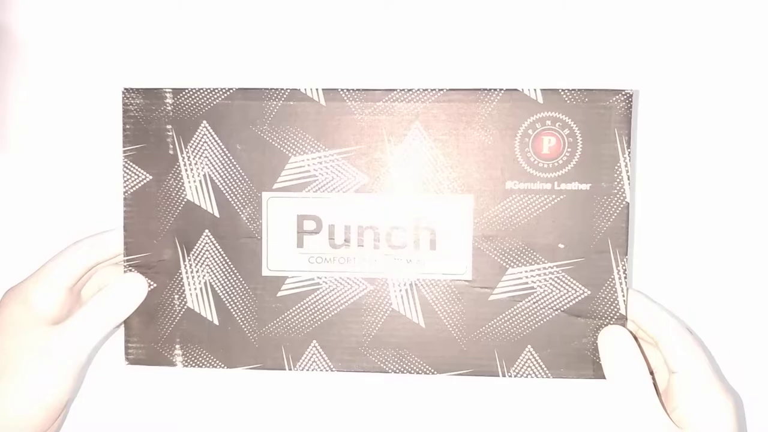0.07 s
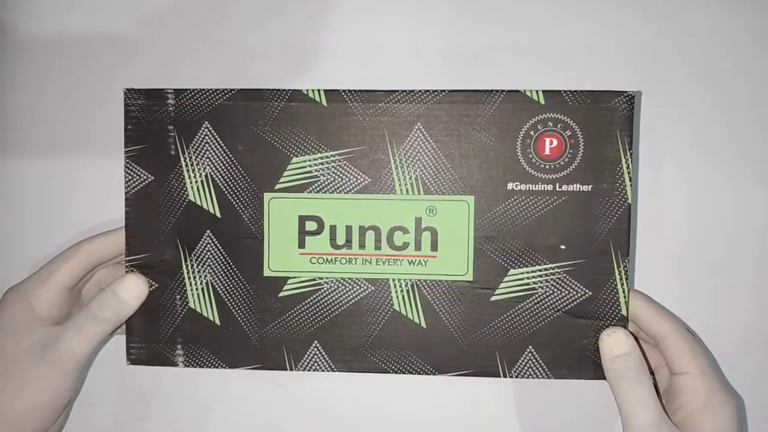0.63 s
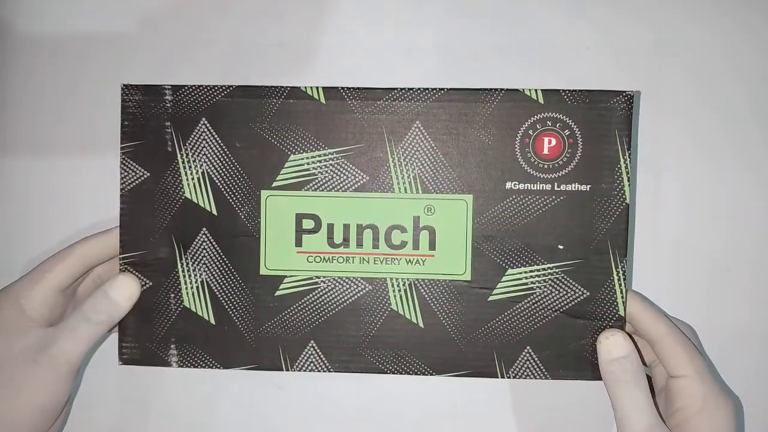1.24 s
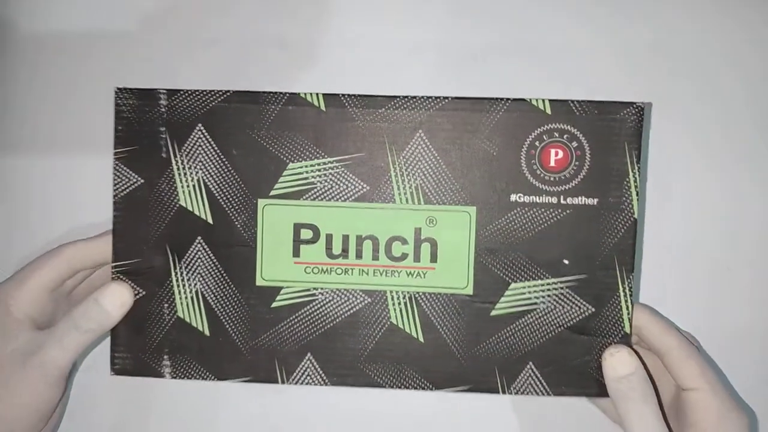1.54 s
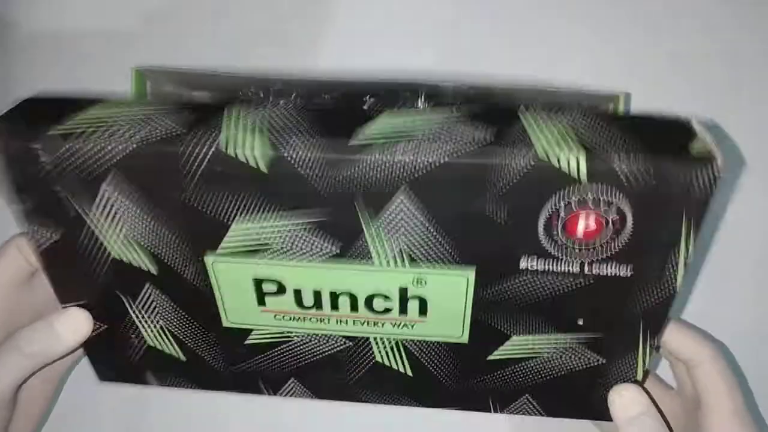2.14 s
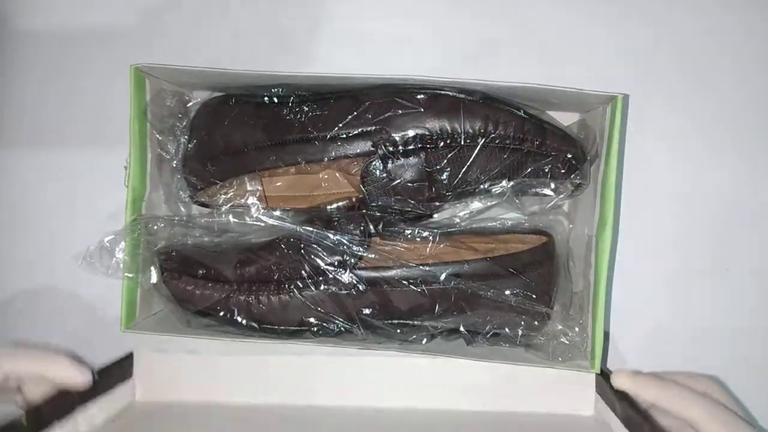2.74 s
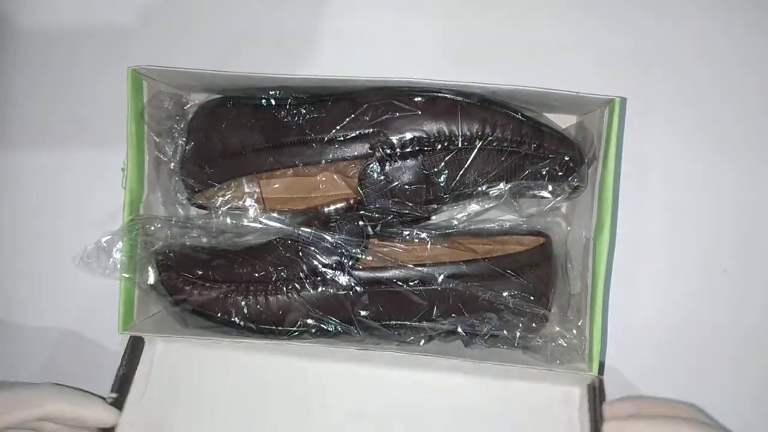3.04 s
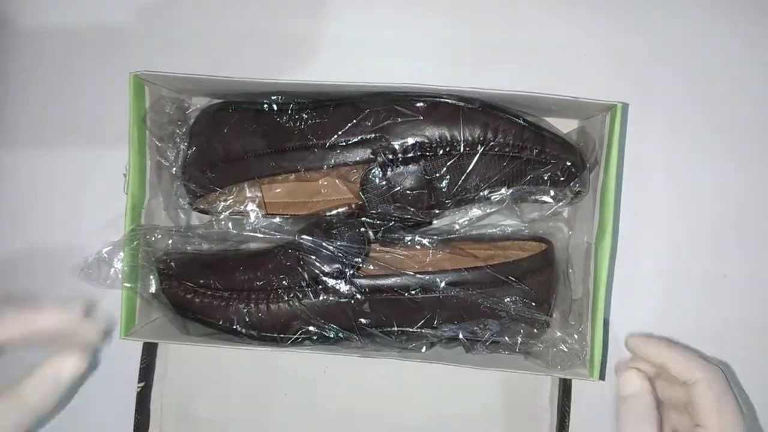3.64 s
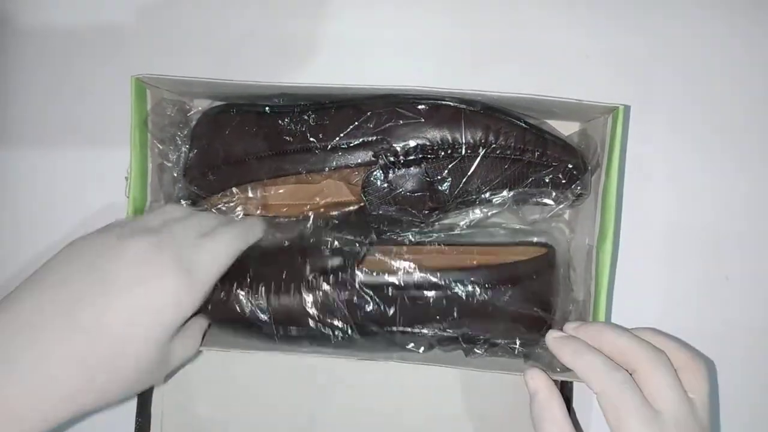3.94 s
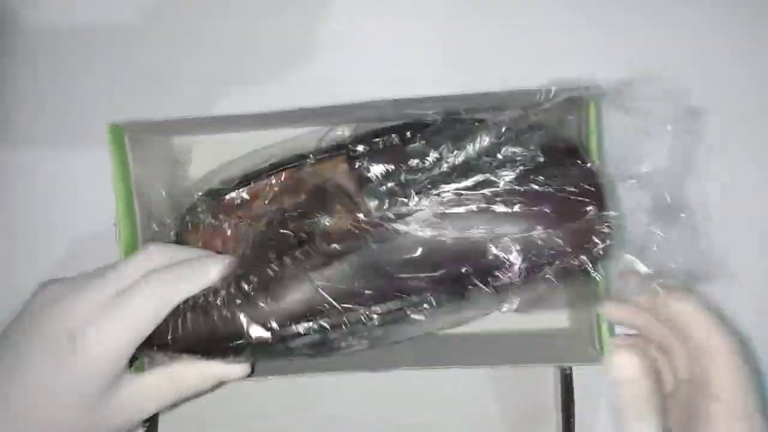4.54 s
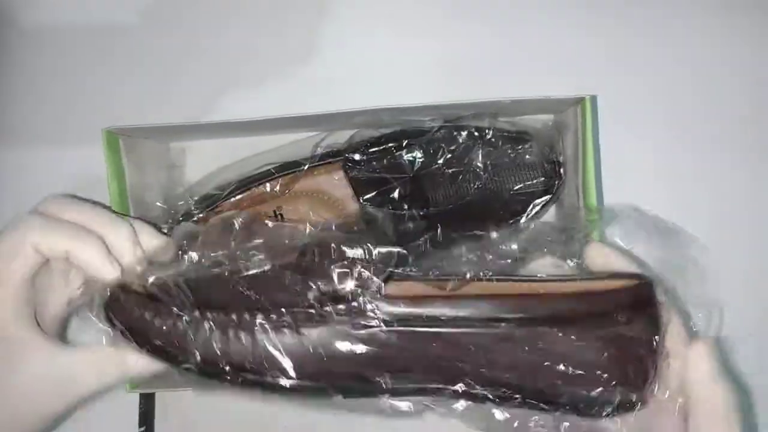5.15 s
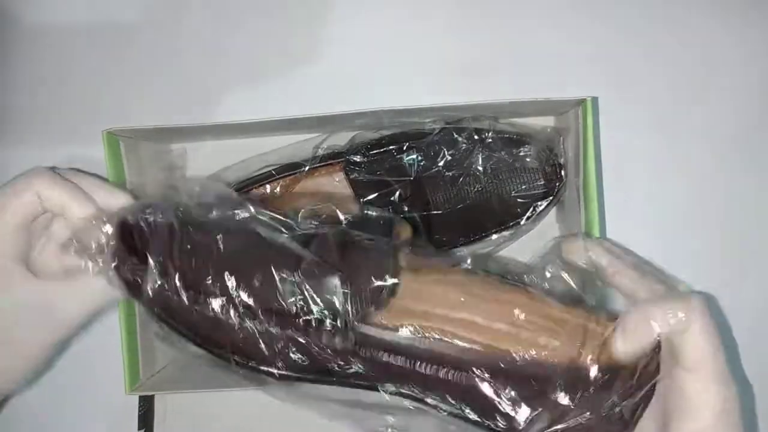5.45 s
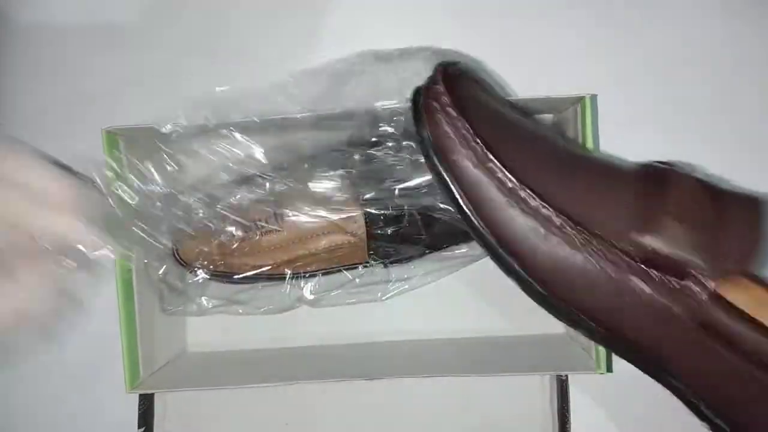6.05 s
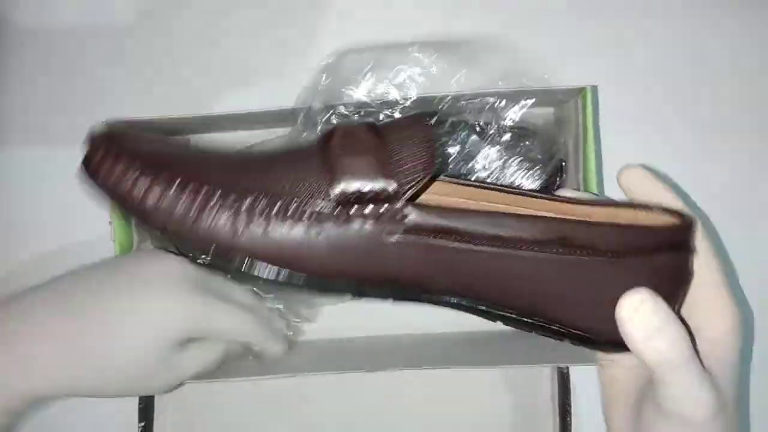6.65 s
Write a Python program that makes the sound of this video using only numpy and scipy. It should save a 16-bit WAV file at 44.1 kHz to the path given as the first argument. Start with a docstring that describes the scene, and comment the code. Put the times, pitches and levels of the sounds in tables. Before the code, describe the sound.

A steady rush of air, like a fan, fades in within a small room. The lid of a cardboard shoe box scrapes, knocks loose and flops down with hollow thumps. Then a thin plastic bag is pulled off a shoe in repeated tugs, fizzing, crackling and snapping, while the shoe bumps the box a few times. Everything is heard from close by, in stereo.

```python
"""In a small room with a steady rush of air, as from a fan, a cardboard shoe box is opened on a table.
The lid scrapes, knocks loose and flops down, and a shoe bumps the box: each blow puffs out air, rings
the panels and slaps card on card. The shoe's thin plastic bag is pulled off tug by tug, fizzing as it
slides, crackling as it creases and snapping as folds flip over. Two unlike microphones, a hand apart,
hear it all from close by, and the sound fades in at the start."""
import sys
import numpy as np
from scipy import signal
from scipy.fft import rfft, irfft
from scipy.io import wavfile

SR = 44100
rng = np.random.default_rng(int(sys.argv[2]) if len(sys.argv) > 2 else 0)


def digitize_waveform(pressure):
    """Quantize a signal to 16-bit integers and store it at the path in sys.argv[1].

    Rows of a 2-D input are taken as channels; values are limited to [-1, 1].
    """
    field = np.atleast_2d(pressure).T
    bounded = np.clip(field, -1, 1)
    quanta = np.round(bounded * 32767).astype(np.int16)
    wavfile.write(sys.argv[1], SR, quanta)


N = 300497

# tone of the rushing air: (frequency [Hz], level [dB])
AIR_TONE = [(20, -4.5), (65, -6), (115, -11), (175, -2.5), (220, -1), (260, -8.5), (360, -0.5),
            (600, -11.5), (800, -9), (1300, -13.5), (1950, -14.5), (2450, -20), (3100, -34), (6000, -54.5)]
# tone of the faint background hiss: (frequency [Hz], level [dB])
HISS_TONE = [(1500, -75), (3000, 4), (4200, 4.5), (6000, 0.5), (7500, 0.5), (9000, -10), (11000, -15),
             (16000, -46)]
# moments when the background hiss drops out: (time [s], depth [dB], half width [s])
HISS_DROPOUTS = [(.66, 26, 0.013), (.99, 7.5, 0.091), (1.25, 9, 0.03), (3.55, 16, 0.015), (3.67, 22, 0.039)]
# the lid comes off, is laid back and drops: (peak time [s], length [s], level [dB])
LID_SCRAPES = [(2.105, .035, -70), (2.188, 0.08, -51), (2.828, .02, -57), (2.94, 0.068, -62),
               (3.24, 0.059, -53.5)]
# tone of sliding card or plastic: (frequency [Hz], level [dB])
SLIDE_TONE = [(300, -11), (1000, 4.5), (2200, 3), (3100, -4.5), (4200, -1.5), (5800, -3.5), (7500, -6),
              (9000, -11), (11000, -19), (13000, -32), (16000, -26)]
# blows on the box; the last two columns are compared with the first strike: (time [s], puff [dB],
# puff pitch [Hz], ring [dB], slap before its gain [dB], brightness [Hz], flat landing [dB], rebound [dB])
BOX_KNOCKS = [(2.165, -10.5, 230, -27, -16.5, 1070, 5.5, -2.5), (2.197, -16, 200, -43, -20, 1640, -22, -26),
              (2.231, -22, 90, -31.5, -24, 1450, -3, -18), (2.278, -17, 150, -36, -34, 606, -12, -17),
              (2.835, -35.5, 110, -38.5, -27, 1700, -3.5, -30),
              (2.946, -31, 120, -42, -29.5, 1740, -1.5, -20), (3.059, -55, 120, -52, -28.5, 1150, -19, -24),
              (3.2036, -43, 330, -62, -30, 7000, -16, -32),
              (3.2049, -11.5, 298, -34.5, -11.5, 1240, -0.5, -14),
              (3.433, -20.5, 170, -54, -51, 385, -3.5, -22), (3.914, -49, 130, -39.5, -34, 700, 0, -18),
              (4.027, -33, 94, -37, -35, 900, -7, -26), (4.092, -37, 130, -33, -43, 1000, -9, -23),
              (4.592, -10, 124, -27.5, -14.5, 1840, -2.5, -9.5),
              (5.815, -24.5, 130, -42, -25, 690, 3.5, -6.5), (6.204, -31, 79, -38, -39, 930, -0.5, -22)]
# notes at which the box's panels ring: (frequency [Hz], level [dB])
PANEL_NOTES = [(80, -19.5), (95, 0.5), (150, -38.5), (236, -0.5), (275, 1.5), (325, -27.5), (452, 4.5),
               (560, -16), (655, -41), (790, -56), (940, -2), (1320, -24), (1980, -1)]
# tone of card slapping on card: (frequency [Hz], level [dB])
SLAP_TONE = [(30, -22), (100, -8), (400, 0), (900, 1), (1500, 0), (2100, 0), (3000, -4), (5000, -4),
             (7500, -1), (10000, -10), (16000, -22)]
# how fast a slap dies: (frequency [Hz], time to fall 60 dB [s])
SLAP_DECAY = [(200, .07), (1000, .06), (3000, .05), (12000, .05)]
# sharp snaps of the plastic: (time [s], tick [dB], pop [dB])
BAG_SNAPS = [(2.8867, -39, -56), (2.9345, -40.5, -52), (3.201, -30, -25), (3.7475, -39.5, -63),
             (3.8416, -43, -58), (4.3403, -28.5, -26), (4.642, -25, -26), (4.9113, -20, -19),
             (4.929, -47, -44), (4.9497, -21.5, -17.5), (5.3868, -30.5, -37), (5.504, -33, -25),
             (5.592, -30, -32), (5.8194, -27, -23), (5.877, -35, -26.5), (6.0543, -33, -44)]
# tone of a snap's bright tick, and of its hollow pop: (frequency [Hz], level [dB])
TICK_TONE = [(500, -22), (2200, -5), (3200, -9), (5500, -4), (7400, 4), (9000, -8), (12000, -16),
             (16000, -17)]
POP_TONE = [(150, -14), (600, -6), (1000, 0), (2300, 0), (3300, -9), (8000, -20), (16000, -42)]
# tugs at the bag: (peak time [s], length [s], sliding before boost [dB], creasing before boost [dB])
BAG_TUGS = [(3.936, 0.17, -57.5, -69.5), (4.424, 0.12, -54, -72), (4.556, 0.064, -53, -67.5),
            (4.88, 0.16, -52, -64), (5.154, .032, -52.5, -65), (5.382, 0.29, -54.5, -69),
            (5.494, 0.068, -48, -64), (5.592, 0.03, -46.5, -64), (5.767, 0.27, -51, -65.5),
            (6.178, 0.068, -48, -66), (6.4, 0.18, -53.5, -69.5), (6.623, 0.13, -47, -70),
            (6.718, .13, -48.5, -76)]
# tone of creasing plastic: (frequency [Hz], level [dB])
CREASE_TONE = [(500, 7), (2200, 14), (3200, -9.5), (5500, 2), (7300, 11), (9000, -4.5), (12000, -8),
               (16000, -11)]
# how fast the room's echo dies: (frequency [Hz], time to fall 60 dB [s])
ROOM_DECAY = [(60, .28), (250, .33), (1000, .3), (4000, .3), (14000, .2)]
# how the two microphones differ: (frequency [Hz], left minus right [dB])
MIC_BALANCE = [(60, 1.54), (1000, 0.4), (2400, -1), (3200, 2), (4200, 7.5), (6000, 10), (7300, 12),
               (8600, 1), (10000, -8), (12000, -7.5), (15500, -6)]

FREQS = np.fft.rfftfreq(4096, 1 / SR)  # where filter gains are set, in Hz
TIME = np.arange(N) / SR


def amp(db):
    """Turns decibels into a gain."""
    return 10 ** (np.asarray(db) / 20)


def unit(x):
    """Scales a signal to an average (rms) strength of 1."""
    return x / np.sqrt(np.mean(x ** 2) + 1e-20)


def read(table, hz=FREQS):
    """Reads between a table's rows along a logarithmic frequency axis."""
    row_hz, values = np.transpose(table)
    return np.interp(np.log(hz + 1), np.log(row_hz + 1), values)


def add(mix, start_s, sound):
    """Mixes a sound in at the given time."""
    part = mix[:, round(start_s * SR):][:, :sound.shape[-1]]
    part += sound[..., :part.shape[1]]


def colour(x, db):
    """Shapes the tone with a gain at each of FREQS; nothing rings ahead of the sound."""
    log_gain = np.log(amp(np.concatenate([db, db[-2:0:-1]])))
    taps = np.fft.ifft(np.exp(np.conj(signal.hilbert(log_gain)))).real
    return signal.oaconvolve(x, taps[None], axes=1)[:, :x.shape[1]]


def diffuse(size, mic_gap_m=0.13):
    """Noise from all sides: the two microphones agree only on long waves."""
    a, b = rfft(rng.standard_normal((2, size)))
    alike = np.sinc(2 * np.fft.rfftfreq(size, 1 / SR) * mic_gap_m / 343)
    mid, side = a * np.sqrt((1 + alike) / 2), b * np.sqrt((1 - alike) / 2)
    return irfft([mid + side, mid - side], size)


def dying_noise(decay, size):
    """Noise from all sides in which each frequency band dies at its own speed."""
    hz, t, bands = signal.stft(diffuse(size), SR, nperseg=128)
    fall = amp(-60 * t / read(decay, hz)[:, None])
    return signal.istft(bands * fall, SR)[1][:, :size]


def stroke(peak_s, length_s, rise_share=0.59):
    """A hand movement gathers speed, then eases off more slowly."""
    late = TIME - peak_s
    width_s = length_s * np.where(late < 0, rise_share, 1)
    return np.exp(-np.minimum((late / width_s) ** 2, 20))


def grains(per_s, spread_db):
    """Tiny clicks at random moments, mostly small, each reaching the two microphones differently."""
    sizes = amp(spread_db * np.minimum(rng.exponential(1, N), 3.5))
    happens = rng.random(N) < per_s / SR
    return sizes * happens * rng.standard_normal((2, N))


def air(level_db=-39.5, cutoff_hz=6000):
    """Moving air makes a dull rush."""
    treble_cut_db = 10 * np.log10(1 + (FREQS / cutoff_hz) ** 4)
    return amp(level_db) * unit(colour(diffuse(N), read(AIR_TONE) - treble_cut_db))


def background_hiss(level_db=-66):
    """A faint, high hiss briefly drops out a few times."""
    drop_db = sum(depth * np.exp(-((TIME - s) / width) ** 2) for s, depth, width in HISS_DROPOUTS)
    return amp(level_db - drop_db) * unit(colour(diffuse(N), read(HISS_TONE)))


def lid_scrapes():
    """Card rubs on card with a fine, even grain."""
    level = sum(amp(db) * stroke(s, length_s) for s, length_s, db in LID_SCRAPES)
    fibres = grains(per_s=7000, spread_db=2)
    return level * unit(colour(fibres, read(SLIDE_TONE)))


def contacts(landing_s=0.0052, rebound_s=0.019, dulling=0.46):
    """In each blow an edge strikes, the face lands flat, and the loose card swings back twice."""
    for s, puff_db, puff_hz, ring_db, slap_db, bright_hz, flat_db, rebound_db in BOX_KNOCKS:
        yield s, puff_db, puff_hz, ring_db, slap_db, bright_hz
        # the later contacts are lower and duller, with a larger share of ring
        yield (s + landing_s, puff_db + flat_db, puff_hz * 0.48,
               ring_db + flat_db + 3.5, slap_db + flat_db, bright_hz * dulling)
        for bounce in (1, 2):
            yield (s + bounce * rebound_s, puff_db + rebound_db, puff_hz * 0.64,
                   ring_db + rebound_db + 5, slap_db + rebound_db - 7, bright_hz * dulling)


def panel_ring(t, quality=10, bend_s=0.0013):
    """Card soaks up motion, so every panel note dies after about the same number of swings."""
    detunes = 1 + 0.016 * rng.standard_normal(len(PANEL_NOTES))  # the grip shifts the notes
    ring = np.zeros(len(t))
    for (hz, db), detune in zip(PANEL_NOTES, detunes):
        ring -= amp(db) * np.exp(-np.pi * hz * t / quality) * np.sin(2 * np.pi * hz * detune * t)
    return ring * (1 - np.exp(-t / bend_s))  # soft card takes a moment to bend


def card_slap(t, bright_hz, gain=7, damping=0.46, clatter_db=-2):
    """Card hits card with a click and a short clatter; the struck spot gives like a damped spring."""
    clatter = dying_noise(SLAP_DECAY, len(t))
    click = t == 0
    contact = amp(clatter_db) * clatter / np.linalg.norm(clatter[0]) - click
    ratio = FREQS / bright_hz
    spring_db = -10 * np.log10((1 - ratio ** 2) ** 2 + (damping * ratio) ** 2)
    slap = colour(contact, read(SLAP_TONE) + spring_db)
    return gain * slap / np.linalg.norm(slap)


def box_knocks():
    """Each contact pushes out a puff of air, rings the panels and slaps card on card."""
    out, t = np.zeros((2, N)), np.arange(13312) / SR
    for s, puff_db, puff_hz, ring_db, slap_db, bright_hz in contacts():
        swing = 2 * np.pi * np.sqrt(3) * puff_hz * t
        puff = swing ** 2 * (swing - 3) * np.exp(-swing)  # the wall moves and comes back
        ring = panel_ring(t)
        slap = card_slap(t, bright_hz)
        add(out, s, amp(puff_db) * puff + amp(ring_db) * ring + amp(slap_db) * slap)
    return out


def burst(tone, decay_s, flutter_gain=0.79, size=2048):
    """One click and the brief, dying flutter after it, shaped to the given tone."""
    fall = np.exp(-np.arange(size) / SR / decay_s)
    click = np.arange(size) == 0
    flutter = flutter_gain * rng.standard_normal((2, size)) * fall
    strength = np.sqrt(np.mean(fall ** 2)) / 2
    return strength * unit(colour(2 * click + flutter, read(tone)))


def bag_snaps():
    """A fold flips over: a bright tick, and a hollow pop from the sheet around it."""
    out = np.zeros((2, N))
    for s, tick_db, pop_db in BAG_SNAPS:
        add(out, s, amp(tick_db) * burst(TICK_TONE, decay_s=0.0014))
        add(out, s, amp(pop_db) * burst(POP_TONE, decay_s=0.0018))
    return out


def catching(per_s=45):
    """The plastic catches and lets go in fits: a gain that wobbles by about 1 dB."""
    moments = np.arange(0, N / SR + 1, 1 / per_s)
    wobble_db = unit(np.interp(TIME, moments, rng.standard_normal(len(moments))))
    return amp(wobble_db)


def creases(patch_count=9, cycles=3):
    """Flat patches of crumpled plastic, each of its own size, ring for a few cycles when they flip."""
    out, t = np.zeros((2, N)), np.arange(512) / SR
    flips = grains(per_s=12000, spread_db=2.5)
    patch = rng.integers(0, patch_count, N)
    for k, hz in enumerate(np.geomspace(2000, 15000, patch_count)):
        ping = hz * np.sin(2 * np.pi * hz * t) * np.exp(-2 * hz * t / cycles)
        out += signal.oaconvolve(flips * (patch == k), ping[None], axes=1)[:, :N]
    return out


def bag_rustle(slide_boost_db=3, crease_boost_db=16, grip_s=3.735, grip_rise_s=0.33, settle_s=0.03):
    """Plastic fizzes as it slides over leather and crackles as it creases; both swell with each tug."""
    grip = np.clip((TIME - grip_s) / grip_rise_s, 0, 1)  # once gripped, the bag never quite rests
    slide_power, crease_power = grip * amp(-57.5) ** 2, grip * amp(-76) ** 2
    for s, length_s, slide_db, crease_db in BAG_TUGS:
        speed = stroke(s, length_s)
        slide_power += (amp(slide_db) * speed) ** 2
        crease_power += (amp(crease_db) * speed) ** 2
    # after each snap the plastic rustles on softly for a moment
    kicks = np.zeros(N)
    for s, tick_db, _ in BAG_SNAPS:
        kicks[round(s * SR)] = amp(tick_db)
    settling = signal.lfilter([1], [1, -np.exp(-1 / (settle_s * SR))], kicks)
    slide_power += (amp(-26.5) * settling) ** 2
    crease_power += (amp(-39) * settling) ** 2
    fits = catching()
    rubbing = grains(per_s=7000, spread_db=3)
    fizz = unit(colour(rubbing, read(SLIDE_TONE))) * np.sqrt(slide_power)
    crackle = unit(colour(creases(), read(CREASE_TONE))) * np.sqrt(crease_power)
    return fits * (amp(slide_boost_db) * fizz + amp(crease_boost_db) * crackle)


def room(x, echo_db, gap_s=0.0075):
    """After a tiny gap, the small room answers with a short, blurred echo."""
    tail = dying_noise(ROOM_DECAY, size=24576)
    tail *= np.clip(TIME[:tail.shape[1]] / gap_s - 1, 0, 1)
    echo = signal.fftconvolve(x, tail / np.linalg.norm(tail[0]), axes=1)[:, :N]
    return x + amp(echo_db) * echo


def scene():
    """Box and bag over the moving air and a faint hiss; the knocks and snaps echo in the room."""
    knocks = room(box_knocks(), echo_db=-7.5)
    snaps = room(bag_snaps(), echo_db=-23)
    return knocks + snaps + lid_scrapes() + bag_rustle() + air() + background_hiss()


def record(dry, offset=0.066, fade_start_s=0.3395, fade_s=0.19, muted_db=-71.5, top_hz=15850):
    """The microphones differ mostly in the treble; the level fades in; the highest treble is cut."""
    balance_db = read(MIC_BALANCE)
    mean_db = 10 * np.log10((amp(balance_db) + amp(-balance_db)) / 2)
    left = colour(dry[:1], balance_db / 2 - mean_db)
    right = colour(dry[1:], -balance_db / 2 - mean_db)
    stepped_time = np.floor(TIME * 100) / 100  # the gain moves every 10 ms
    fade_in = 1 - np.exp(-np.maximum(stepped_time - fade_start_s, 0) / fade_s)
    # the rising gain lifts a small steady offset into a soft low bump, which then drains away
    faded = (np.vstack([left, right]) + offset) * (amp(muted_db) + fade_in)
    drained = signal.lfilter(*signal.butter(1, 3, "highpass", fs=SR), faded)
    treble_cut = signal.firwin(511, top_hz, window=("kaiser", 9), fs=SR)
    return signal.oaconvolve(drained, treble_cut[None], "same")


dry = scene()
out = record(dry)
digitize_waveform(out)
```